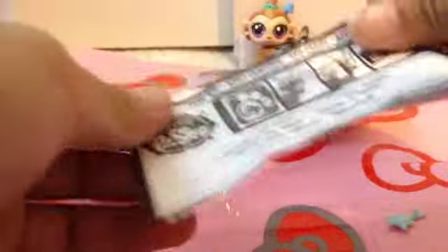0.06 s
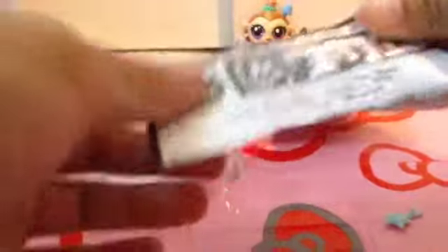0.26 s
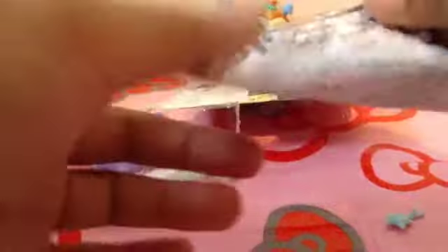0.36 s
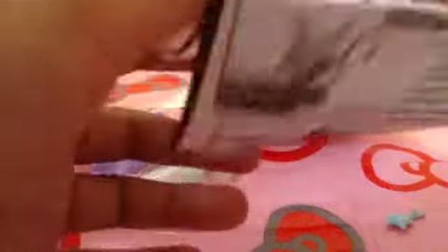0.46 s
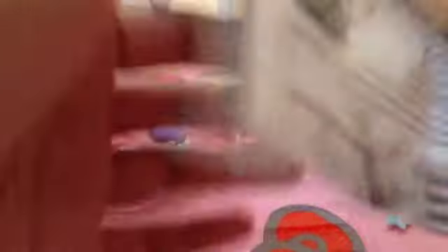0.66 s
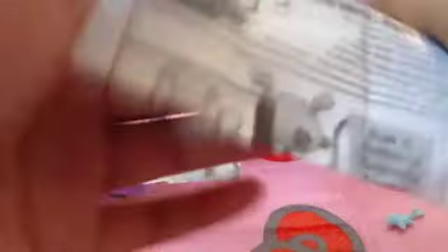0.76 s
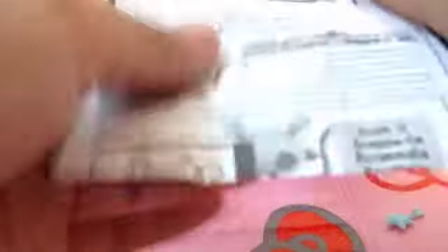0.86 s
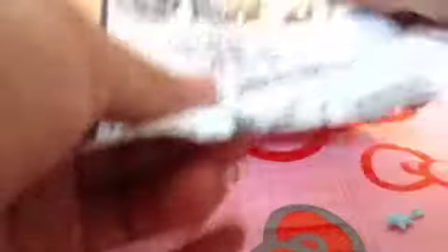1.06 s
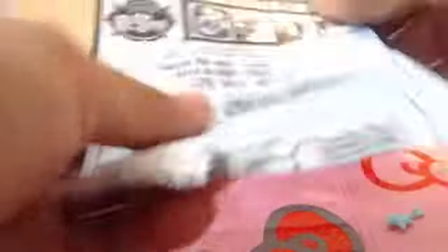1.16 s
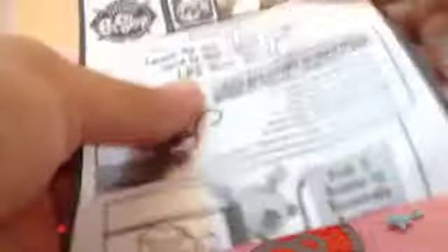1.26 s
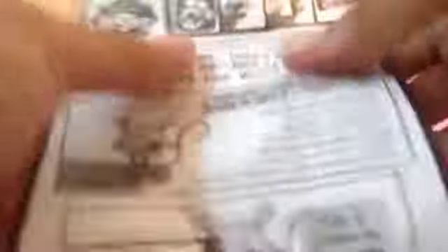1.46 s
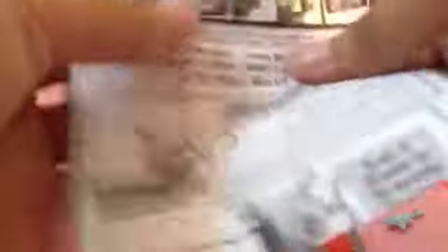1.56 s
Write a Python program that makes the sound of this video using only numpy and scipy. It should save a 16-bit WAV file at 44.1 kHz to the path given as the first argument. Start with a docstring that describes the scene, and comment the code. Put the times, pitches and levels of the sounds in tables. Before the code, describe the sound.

Paper leaflet unfolded by hand, close and dry in a small room with low hum and faint hiss. From 0 to 0.3 s, small crisp crease clicks; to 0.55 s, soft pops and growing rustle. Loud, sharp slaps with low thumps at 0.57 and 0.69 s, crackling until 0.75. Lighter ticks and sliding follow, a clean fold click at 1.03, then quiet grainy rubbing, faint pops and ticks until 1.6 s.

```python
"""In a small room, close to the microphone, a folded paper leaflet is opened by hand.
Creases snap as a click with a short noise rattle; bulges flip as dull pops made of damped modes.
Panels slap with a swelling rattle, a low thump and a puff of noise; one stiff fold clicks and rings.
In between, paper slides over paper and fingertips: grainy filtered noise with larger ticks in it.
One wall echo and a short tail surround the paper; shaped noise gives a low room hum and faint hiss."""
import sys
import numpy as np
from scipy import signal
from scipy.fft import rfft, irfft
from scipy.io import wavfile
from scipy.ndimage import uniform_filter1d

SR = 44100
rng = np.random.default_rng(int(sys.argv[2]) if len(sys.argv) > 2 else 0)


def materialize(psi):
    """Save the field psi as 16-bit PCM at rate SR to the path in sys.argv[1].

    A 1-D psi becomes a single channel; in a 2-D psi each row is a channel.
    """
    bounded = np.clip(np.atleast_2d(psi).T, -1, 1)
    quanta = np.round(bounded * 32767).astype(np.int16)
    wavfile.write(sys.argv[1], SR, quanta)


N = 70560  # length in samples

# Room hum and hiss. Each row: frequency in Hz, relative density in dB per Hz.
HUM_COLOUR = [(25, -26), (50, 1), (70, -0.5), (110, -13), (165, -2), (265, 2), (400, -10), (600, -11),
              (1000, -21), (2000, -29.5), (4000, -28.5), (9000, -28), (16000, -35)]
# Room tail. Each row: band centre in Hz, 60 dB decay time in seconds, level in dB before band colouring.
ROOM_BANDS = [(225, 0.15, -16.5), (663, 0.033, -13), (2280, 0.21, -20), (5170, 0.089, -20.5)]
# Paper sliding. Each row: start in seconds, end in seconds, start level in dB, end level in dB (both
# before SLIDE_DB), tilt in dB per octave, resonance of the rubbed panel in Hz, its height in dB.
SLIDES = [(0, 0.051, -46.5, -58, 2, 7200, 1.5), (0.083, 0.196, -66, -61, -3.5, 4100, 9),
          (0.232, 0.36, -55, -51.5, -3, 4000, -8), (0.426, 0.557, -44.5, -40, 1, 4260, 6),
          (0.559, 0.595, -29, -37.5, -3, 2430, 9), (0.59, 0.684, -47.5, -41, -1, 2640, 7),
          (0.685, 0.737, -29, -35, -1, 2600, 13), (0.736, 0.748, -37, -37, 1.5, 2500, 5),
          (0.75, 0.862, -50.5, -46, 2.5, 5270, 4.5), (0.879, 0.956, -40, -51.5, 1, 5600, 11),
          (0.955, 1.003, -41, -32, 0, 6300, 5.5), (1.004, 1.012, -33, -43, 3, 6300, 13),
          (1.016, 1.077, -49.5, -55, -2.5, 6300, 8), (1.127, 1.209, -47, -42.5, 1.5, 1600, 7),
          (1.208, 1.226, -41, -38.5, 1, 3100, 3.5), (1.225, 1.325, -39.5, -47.5, 2.5, 13070, -2),
          (1.334, 1.366, -45, -56, 0, 7380, 7), (1.354, 1.391, -31, -50.5, 2, 1154, 12.5),
          (1.386, 1.462, -45.5, -45.5, -0.5, 900, 1), (1.457, 1.481, -39.5, -37.5, 1.5, 7700, 4),
          (1.506, 1.553, -69, -39, -3, 2130, 10), (1.562, 1.6, -37, -54, 1.5, 1190, 15)]
# Colour of sliding paper. Each row: frequency in Hz, gain in dB.
SLIDE_COLOUR = [(80, 3.5), (190, 15.5), (500, -1.5), (1000, -1.5), (1600, -3), (2700, 1), (4500, 3),
                (6500, 4), (9000, 5.5), (13000, 5), (16000, 4.5)]
# Bulges that flip through softly. Each row: time in seconds, level in dB, pitch in Hz, decay in ms.
POPS = [(0.2966, -47, 1990, 2.4), (0.4156, -34.5, 1980, 0.66), (0.518, -45.5, 2320, 1.5),
        (1.1649, -40, 1474, 2.2), (1.579, -41.5, 1490, 2), (1.5824, -40.5, 1840, 3.3)]
# Modes of a bulge. Each row: multiple of its pitch, relative level in dB.
BULGE_MODES = [(.77, -2.5), (1, -0.5), (1.19, -3.5), (2.15, -11)]
# Panels that swing over and slap. Each row: time in seconds, crack level in dB, crack centre in Hz,
# width in octaves, rise in ms, decay in ms, flex level in dB, flex pitch in Hz.
SLAPS = [(0.4142, -38, 1790, 1.2, 1.45, 3.3, -35, 334), (.569, -23, 7060, 0.98, 0.26, 1.44, -25.5, 242),
         (.573, -39.5, 2000, 2.2, 1, 2.5, -34, 540), (0.69, -17.5, 4240, 1.24, 0.78, 3.2, -22, 503),
         (0.718, -29.5, 5500, 2.2, 1.3, 1.4, -50, 288), (0.728, -31, 2320, 0.44, 0.82, 1.2, -28, 273.4),
         (0.7475, -31.5, 7000, 2.3, 1.6, 4.8, -66, 247), (1.1664, -45, 2960, 1.24, 1.1, 1.6, -47.5, 576),
         (1.331, -49.5, 7000, 1.3, 1.6, 2.8, -44.5, 245)]
# Colour the sheet gives to every crack. Each row: frequency in Hz, gain in dB.
SHEET_COLOUR = [(70, 12.5), (220, 15), (600, 7), (1000, 6.5), (1500, 2), (2300, 4.5), (3200, 1),
                (4100, 0.5), (5100, 0), (6100, 2), (7200, -0.5), (9000, 2), (11000, -1), (14000, 0.5),
                (16000, 1)]
# A stiff fold rings briefly as it clicks open. Each row: mode in Hz, level in dB, decay in ms.
STIFF_FOLD_MODES = [(258, -40.5, 4), (1300, -41, 1.4), (2160, -39.5, 1.2), (2850, -33.5, 0.59),
                    (3770, -35.5, 0.79), (4240, -42, 2.3), (6000, -26, 0.54), (9160, -40.5, 0.49),
                    (13400, -46, 0.076)]
# Creases that pop. Each row: time in seconds, crack level in dB, crack centre in Hz,
# width in octaves, decay in ms, flex level in dB.
SNAPS = [(0.0731, -36.5, 8050, 0.98, 3.6, -40), (0.1389, -33.5, 4500, 1.25, 2.2, -38.5),
         (0.1872, -34, 6100, 0.99, 1, -38), (0.2026, -33, 4640, 0.67, 2.9, -40.5),
         (0.222, -32, 4700, 1.07, 3.1, -40.5), (0.2692, -46.5, 3600, 1.26, 1.2, -44.5),
         (0.382, -42.5, 7000, 1.8, 20, -50), (.4285, -41.5, 7040, 1.6, 0.95, -76),
         (0.4672, -38, 5640, 0.98, 4.3, -43), (0.4787, -36.5, 2380, 2.6, 4.2, -38),
         (.519, -42.5, 3340, 0.93, 2.6, -44), (0.565, -37.5, 9000, 0.54, 0.72, -41),
         (0.5765, -36.5, 2220, 0.55, 1.1, -45), (.5836, -42, 8000, 2.2, 1.1, -59),
         (.6015, -38, 5150, 1.6, 1, -43.5), (0.604, -36.5, 2540, 1.1, 2.7, -42),
         (0.7436, -28.5, 9000, 2.7, 1.4, -47.5), (0.7555, -40, 4500, 1.3, 0.97, -70),
         (.813, -49, 6000, .9, 3.4, -61), (0.8349, -42.5, 5950, 1.4, 6, -51),
         (0.8459, -40, 4400, 1.5, 3.5, -54.5), (0.8512, -37.5, 4200, 5.1, 8.4, -47),
         (0.8576, -36.5, 3260, 1.08, 0.89, -44.5), (1.132, -52, 1940, 0.53, 3.3, -53),
         (1.1791, -48.5, 1460, 0.92, 0.52, -52), (1.353, -40.5, 8100, 7.9, 1.1, -56),
         (1.44, -44, 1250, 1.7, 3.9, -66), (1.5153, -51, 3950, 3.8, 1.2, -71),
         (1.5353, -43.5, 4000, 3.9, 0.61, -48.5), (1.5396, -43, 4400, 1.5, 0.44, -46),
         (1.5827, -40.5, 1580, 0.83, 1.5, -50), (1.5914, -48, 1490, 0.96, 1.5, -68)]
# Bending modes of the sheet. Each row: centre of the random pitch in Hz, relative level in dB, decay in ms.
FLEX_MODES = [(227, 5, 3.9), (300, -0.5, 7), (429, -1, 3.96), (608, -6, 5.3)]
# Ringing of the stiff, folded leaflet. Each row: centre of the random pitch in Hz,
# level in dB against the crack, decay in ms.
FOLDED_MODES = [(2255, -10, 2), (4110, -5.5, 1.54)]

HUM_DB = -52
ECHO_S, ECHO_DB = 0.016, -22.5  # nearest wall
# Each short sound has a buffer of EVENT_S with its hit at LEAD_S; its level is taken over LEVEL_S.
EVENT_S, LEAD_S, LEVEL_S = 0.08, 0.015, 0.007
LEAD = int(LEAD_S * SR)  # samples
SLIDE_EDGE_S, SLIDE_DB = 0.0088, -3  # how fast contact builds; level trim of every slide
GRAIN_DB, FLICKER_DB = 1, 1.96  # depth of the fine grain and of the slower flutter
TICKS_PER_S, TICK_DB, TICK_SPREAD_DB = 160, -11, -5.5  # average rate, level against the grain, spread
POP_RISE_MS, SNAP_RISE_MS, THUMP_RISE_MS, FOLDED_RISE_MS = 0.17, 0.16, 0.68, 0.28
THUMP_DECAY_CYCLES, FLEX_RISE_CYCLES = 0.91, 0.71  # low pitches fade or build more slowly
OVERTONE, OVERTONE_DB = 2.35, -12.5  # second thump mode: pitch ratio and level against the first
PUFF_DB, PUFF_MS, PUFF_PITCH = -8, 3.6, 1.38  # level against the thump, decay, centre as ratio of its pitch
THUMP_EARLY_S = 0.0008  # the air cushion moves before the panel lands
FOLD_S = 1.0318  # when the stiff fold clicks
FIRST_CLICK = 0.43  # height of the click added to a rattle of energy 1
FLEX_SCATTER, FOLDED_SCATTER = 0.15, 0.023  # random pitch spread, as a fraction
FOLDED_UNTIL_S = 0.28  # snaps before this also ring
TOP_HZ = 15900  # upper limit of the microphone


def undb(db):
    """Decibels to gain."""
    return 10 ** (np.asarray(db) / 20)


def unit(x):
    """Scale to rms 1."""
    return x / np.sqrt(np.mean(x ** 2))


def burst(x, db):
    """Scale a short sound so its energy, spread over LEVEL_S, has the given level."""
    return x * undb(db) * np.sqrt(LEVEL_S * SR / np.sum(x ** 2))


def freqs(x):
    """Frequencies of the spectrum of x in Hz, at least 1."""
    return np.maximum(np.fft.rfftfreq(len(x), 1 / SR), 1)


def curve(x, points):
    """Join (Hz, dB) points over the spectrum of x, on a log frequency axis."""
    hz, db = np.array(points).T
    return np.interp(np.log(freqs(x)), np.log(hz), db)


def colour(x, db):
    """Causal minimum-phase filter with the given gain at each frequency."""
    cepstrum = irfft(np.log(undb(db)), len(x))
    cepstrum[1:] *= 2
    cepstrum[len(x) // 2:] = 0
    return irfft(rfft(x) * np.exp(rfft(cepstrum)), len(x))


def hump(x, hz, octaves):
    """A broad resonance, in dB, with its peak at 0."""
    away = (np.log2(freqs(x) / hz) / octaves) ** 2
    return -40 * np.log10(1 + away / 4)


def walk(rate):
    """Random values, rate per second, joined by straight lines."""
    step = int(SR / rate)
    held = np.repeat(rng.standard_normal(N // step + 1), step)
    return uniform_filter1d(held, step)[:N]


def add(out, x, start_s):
    """Mix a short sound in."""
    i = int(start_s * SR)
    out[i:i + len(x)] += x[:max(N - i, 0)]


def period_ms(hz):
    """Length of one cycle."""
    return 1000 / hz


def event_ms():
    """Time around an event, in ms, with the hit at 0."""
    return (np.arange(int(EVENT_S * SR)) - LEAD) / SR * 1000


def ring(hz, decay_ms, rise_ms):
    """One damped mode: a sine that builds quickly and dies exponentially."""
    ms = np.maximum(event_ms(), 0)
    sine = np.sin(2 * np.pi * hz * ms / 1000)
    return sine * np.exp(-ms / decay_ms) * (1 - np.exp(-ms / rise_ms))


def rattle(rise_ms, decay_ms):
    """A run of tiny fibre slips that swells up to the hit and dies away; energy 1."""
    ms = event_ms()
    slips = np.sign(rng.standard_normal(len(ms)))
    x = slips * np.exp(np.minimum(ms / rise_ms, -ms / decay_ms))
    return x / np.sqrt(np.sum(x ** 2))


def crack(push, db, hz, octaves):
    """The sheet radiates a push: its own colour plus a hump at the pitch of the facet that moved."""
    return burst(colour(push, hump(push, hz, octaves) + curve(push, SHEET_COLOUR)), db)


def background():
    """Low room hum under a faint hiss, both from one shaped noise."""
    noise = rng.standard_normal(N)
    return undb(HUM_DB) * unit(colour(noise, curve(noise, HUM_COLOUR)))


def room(x):
    """One wall echo and a short tail that decays at its own rate in each band."""
    t = np.arange(SR // 2) / SR
    response = np.zeros(len(t))
    for hz, t60, db in ROOM_BANDS:
        fade = np.exp(-np.log(1000) * t / t60)
        tail = rng.standard_normal(len(t)) * fade * np.minimum(t / ECHO_S, 1)
        energy = np.sum(tail ** 2)
        response += undb(db) * colour(tail, hump(tail, hz, octaves=0.68)) / np.sqrt(energy)
    response[int(ECHO_S * SR)] += undb(ECHO_DB)
    return x + signal.fftconvolve(x, response)[:N]


def rubbing():
    """Fibres catch and slip in a dense, fluttering hiss with a few larger ticks among them."""
    grains = unit(rng.standard_normal(N) * undb(GRAIN_DB * walk(2500)))
    hits = rng.random(N) < TICKS_PER_S / SR
    sizes = undb(TICK_SPREAD_DB * rng.standard_normal(N))
    tick = crack(rattle(SNAP_RISE_MS, decay_ms=0.78), 0, hz=3080, octaves=2.5)[LEAD:]
    ticks = signal.fftconvolve(hits * sizes, tick)[:N]
    rub = (grains + undb(TICK_DB) * unit(ticks)) * undb(FLICKER_DB * walk(90.3))
    return colour(rub, curve(rub, SLIDE_COLOUR))


def slides():
    """Each slide lets the rubbing through while in contact, tinted by the panel that is rubbed."""
    t, out = np.arange(N) / SR, np.zeros(N)
    rub = rubbing()
    spectrum = rfft(rub)
    octave = np.log2(np.maximum(freqs(rub), 1500))  # the tilt acts only above 1500 Hz
    for start, end, start_db, end_db, tilt_db, panel_hz, panel_db in SLIDES:
        touching = 1.0 * ((t >= start) & (t < end))
        contact = uniform_filter1d(touching, int(SLIDE_EDGE_S * SR))
        panel = panel_db * undb(hump(rub, panel_hz, octaves=0.16))
        hiss = unit(irfft(spectrum * undb(tilt_db * octave + panel), N))
        level_db = SLIDE_DB + np.interp(t, [start, end], [start_db, end_db])
        out += contact * undb(level_db) * hiss
    return out


def pops():
    """A bulge flips through with a dull pop: a few damped modes and no sharp click."""
    out = np.zeros(N)
    for s, db, hz, decay_ms in POPS:
        pop = 0
        for k, (ratio, mode_db) in enumerate(BULGE_MODES):
            pop += (-1) ** k * undb(mode_db) * ring(hz * ratio, decay_ms, POP_RISE_MS)
        add(out, burst(pop, db), s - LEAD_S)
    return out


def slaps():
    """A panel brushes in and lands; it bends with a low thump and pushes out a puff of air."""
    out = np.zeros(N)
    for s, db, hz, octaves, rise_ms, decay_ms, flex_db, flex_hz in SLAPS:
        push = rattle(rise_ms, decay_ms)
        puff = rattle(rise_ms, PUFF_MS)
        puff = colour(puff, hump(puff, flex_hz * PUFF_PITCH, octaves=0.57))
        fade_ms = THUMP_DECAY_CYCLES * period_ms(flex_hz)
        thump = ring(flex_hz, fade_ms, THUMP_RISE_MS)
        thump += undb(OVERTONE_DB) * ring(flex_hz * OVERTONE, fade_ms, THUMP_RISE_MS)
        add(out, crack(push, db, hz, octaves) + burst(puff, flex_db + PUFF_DB), s - LEAD_S)
        add(out, burst(thump, flex_db), s - LEAD_S - THUMP_EARLY_S)
    return out


def fold_click():
    """The stiffest fold flips over with one clean, ringing click: damped modes of alternating sign."""
    out = np.zeros(N)
    for k, (hz, db, decay_ms) in enumerate(STIFF_FOLD_MODES):
        mode = burst(ring(hz, decay_ms, SNAP_RISE_MS), db)
        add(out, (-1) ** k * mode, FOLD_S - LEAD_S)
    return out


def sheet_flex():
    """The sheet bends: low damped modes, scattered in pitch, give a knock."""
    flex = 0
    for k, (hz, mode_db, decay_ms) in enumerate(FLEX_MODES):
        pitch = hz * (1 + FLEX_SCATTER * rng.standard_normal())
        mode = ring(pitch, decay_ms, FLEX_RISE_CYCLES * period_ms(hz))
        flex += (-1) ** k * undb(mode_db) * mode
    return flex


def snaps():
    """A crease buckles: one click, a short rattle, and the sheet bends; while still folded it also rings."""
    out = np.zeros(N)
    for s, db, hz, octaves, decay_ms, flex_db in SNAPS:
        push = rattle(SNAP_RISE_MS, decay_ms)
        push[LEAD] += FIRST_CLICK
        add(out, crack(push, db, hz, octaves) + burst(sheet_flex(), flex_db), s - LEAD_S)
        if s < FOLDED_UNTIL_S:
            for mode_hz, mode_db, mode_ms in FOLDED_MODES:
                pitch = mode_hz * (1 + FOLDED_SCATTER * rng.standard_normal())
                knock = ring(pitch, mode_ms, FOLDED_RISE_MS)
                add(out, burst(knock, db + mode_db), s - LEAD_S)
    return out


def scene():
    """The leaflet in the room, over the background."""
    leaflet = snaps() + fold_click() + pops() + slaps() + slides()
    return (room(leaflet) + background())[None]


def record(dry):
    """The microphone thins the deep bass and cuts the top."""
    bass_cut = signal.butter(4, 115, "high", fs=SR, output="sos")
    top_cut = signal.ellip(10, 0.2, 80, TOP_HZ, fs=SR, output="sos")
    return signal.sosfilt(top_cut, signal.sosfilt(bass_cut, dry))


dry = scene()
out = record(dry)
materialize(out)
```